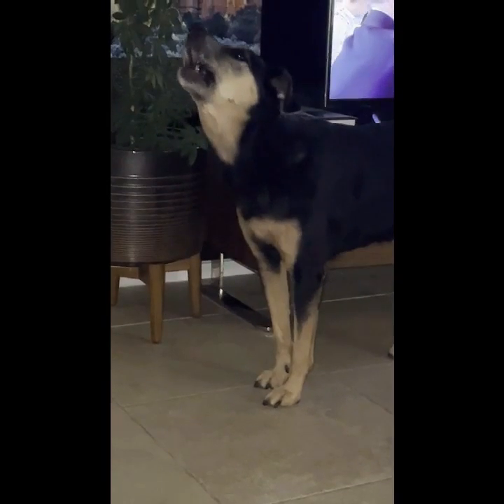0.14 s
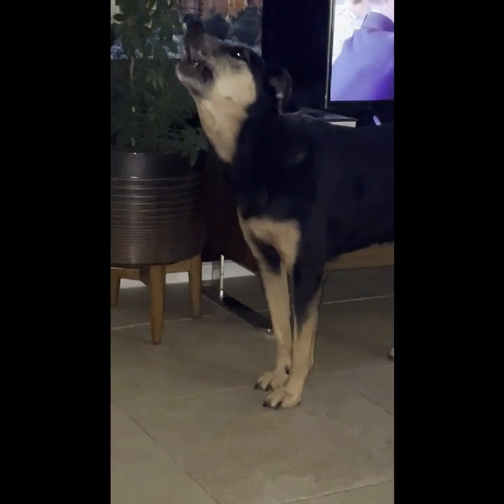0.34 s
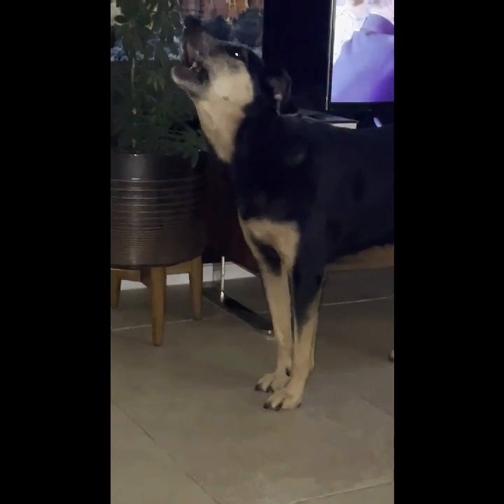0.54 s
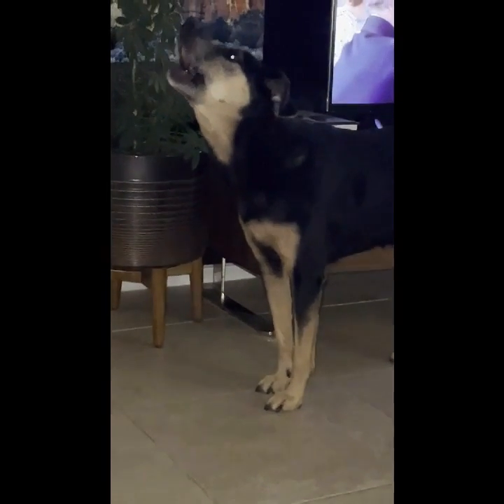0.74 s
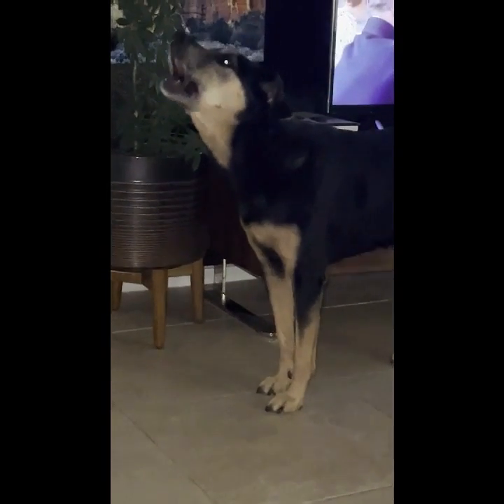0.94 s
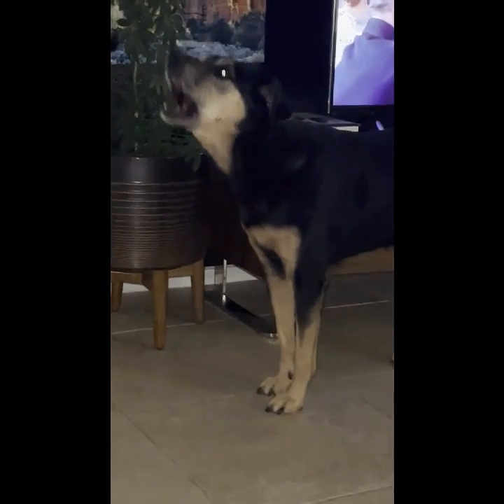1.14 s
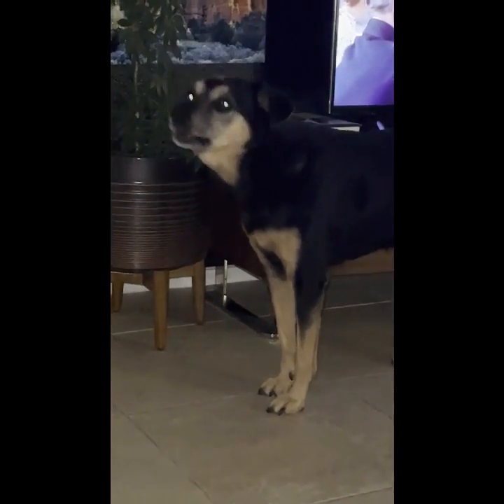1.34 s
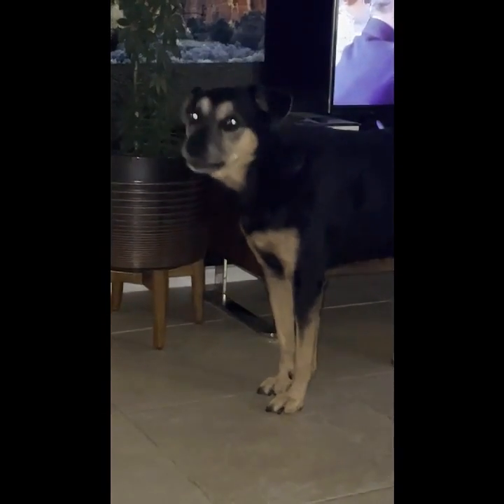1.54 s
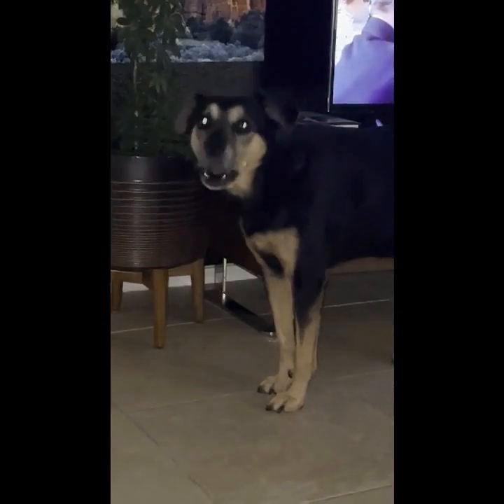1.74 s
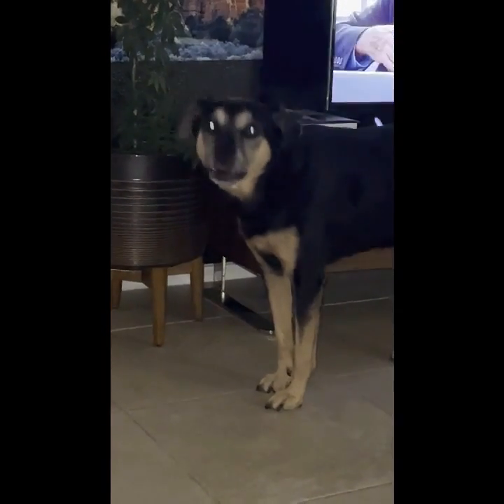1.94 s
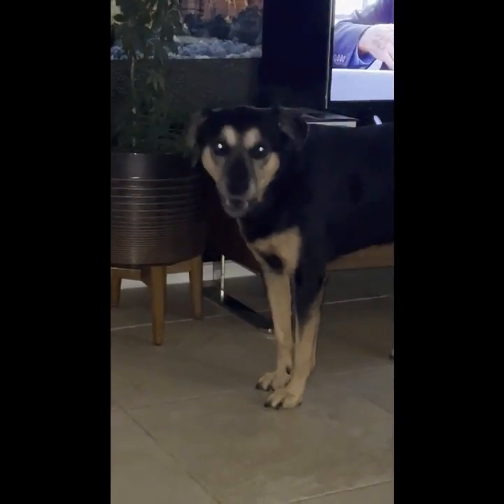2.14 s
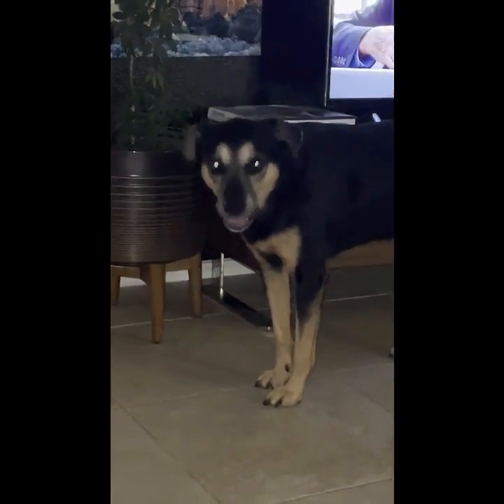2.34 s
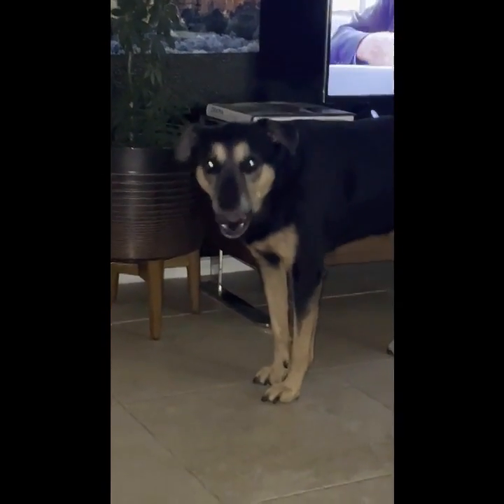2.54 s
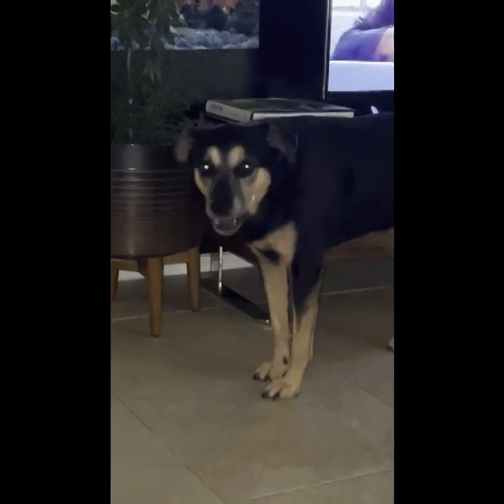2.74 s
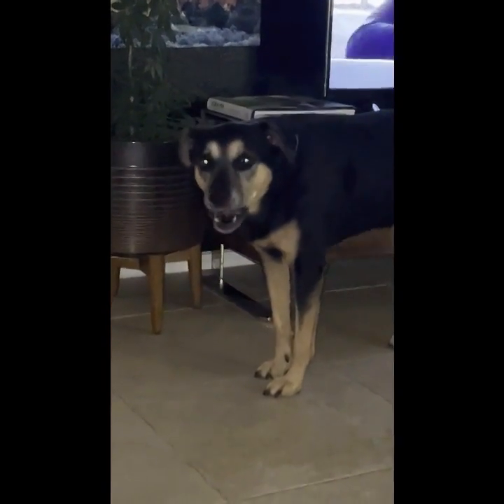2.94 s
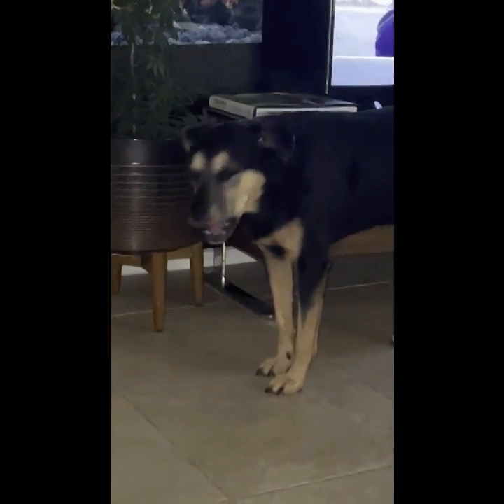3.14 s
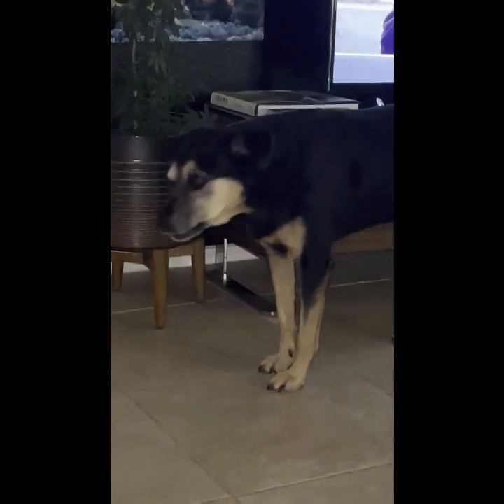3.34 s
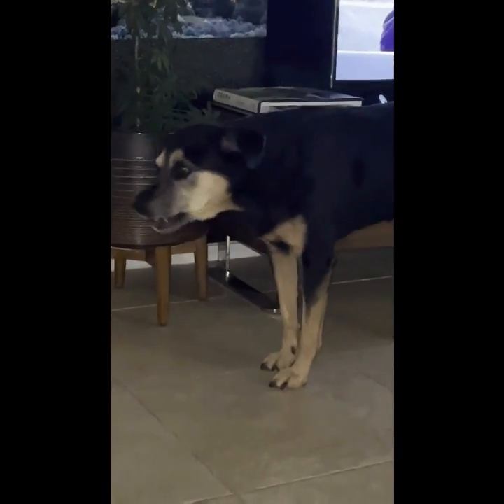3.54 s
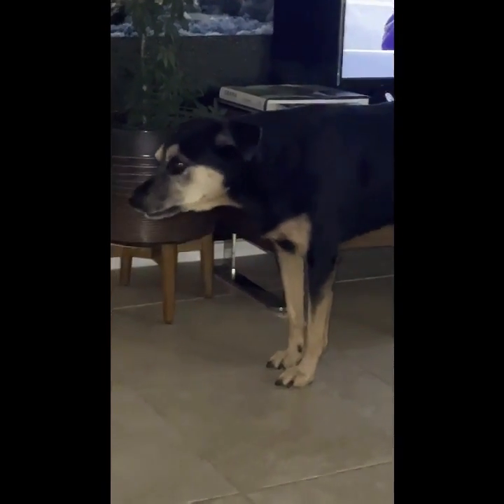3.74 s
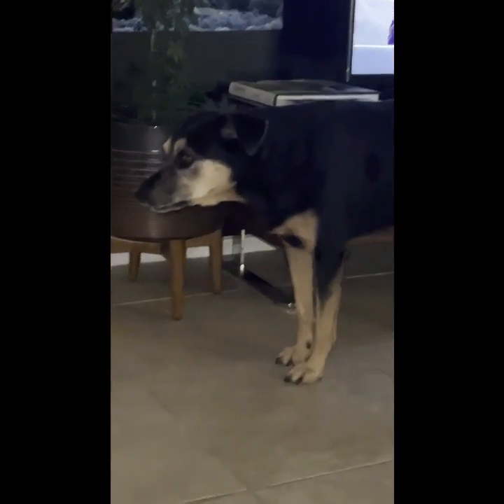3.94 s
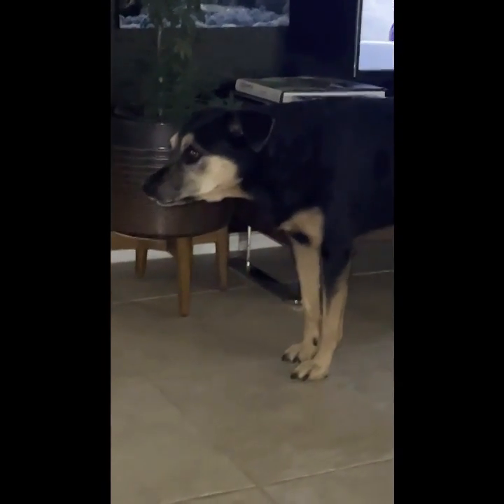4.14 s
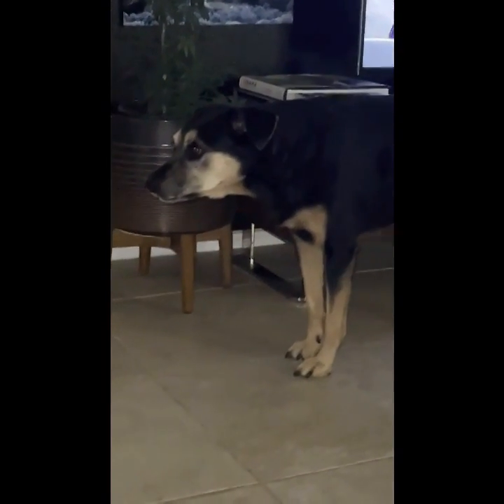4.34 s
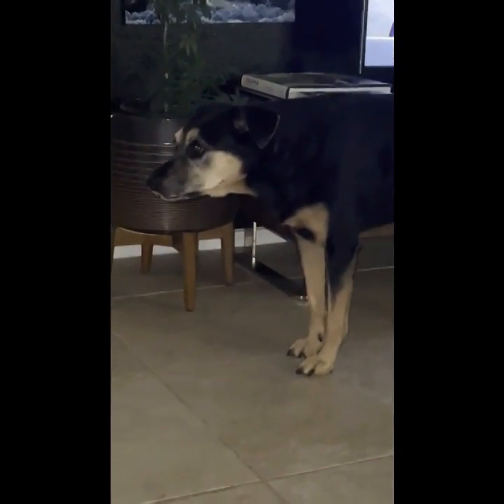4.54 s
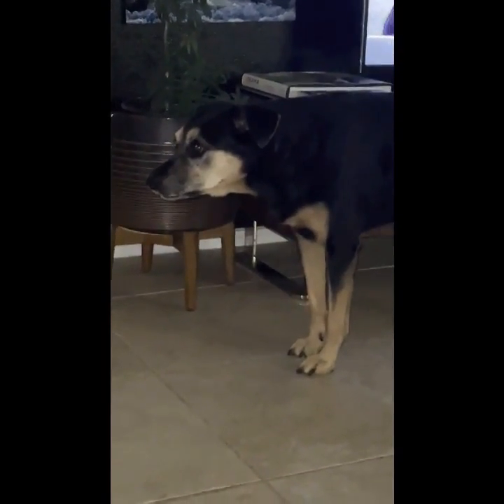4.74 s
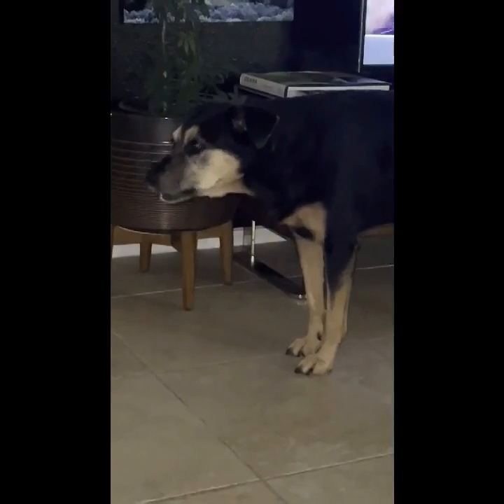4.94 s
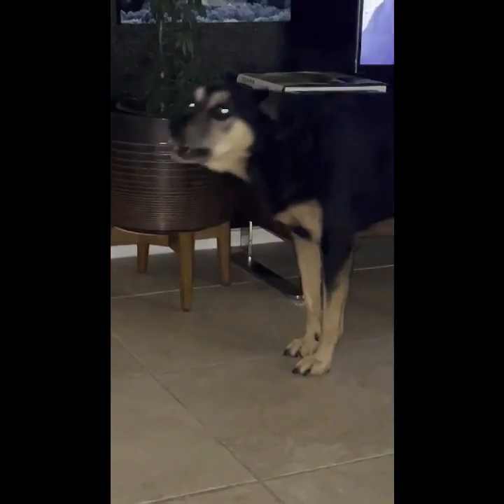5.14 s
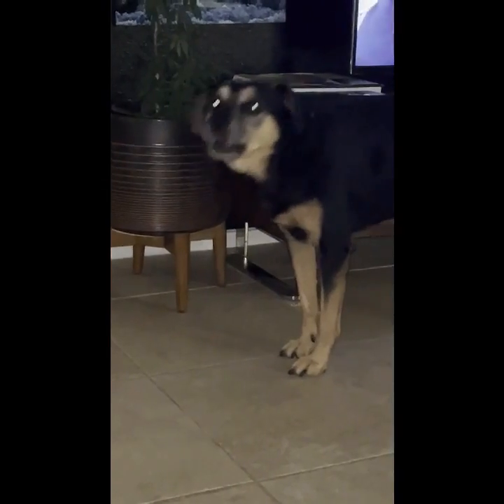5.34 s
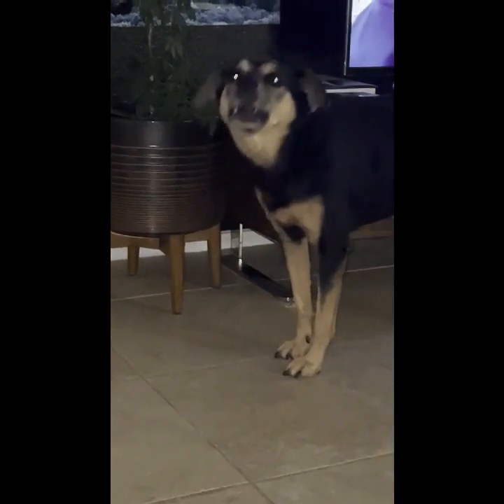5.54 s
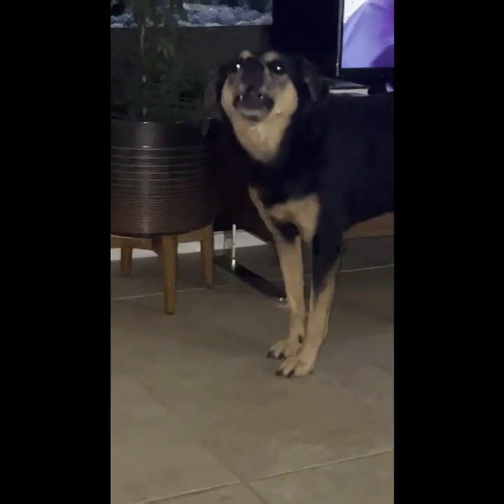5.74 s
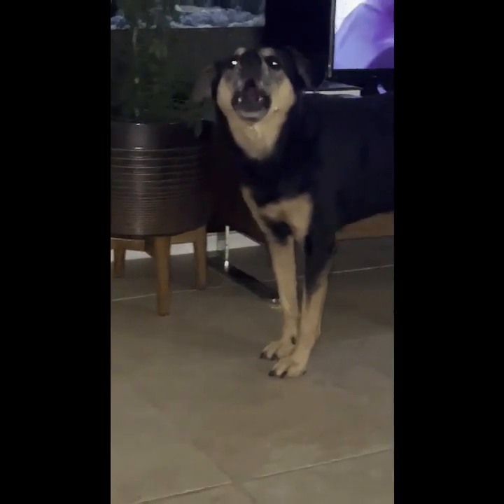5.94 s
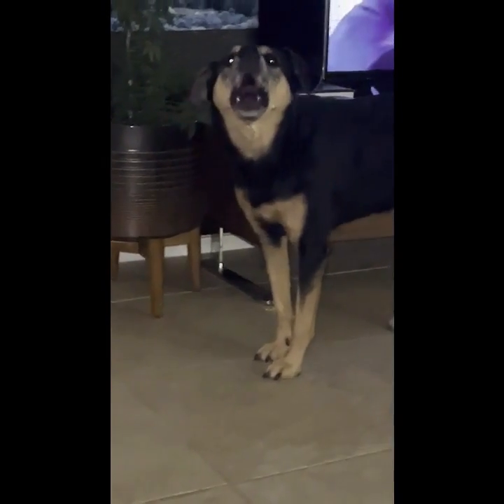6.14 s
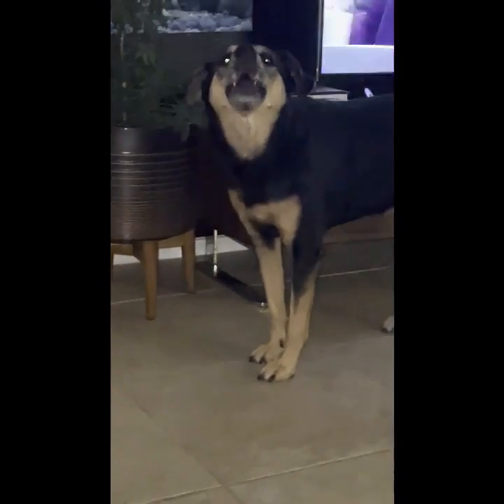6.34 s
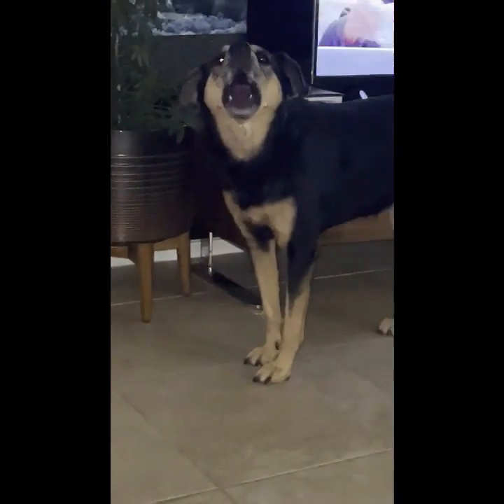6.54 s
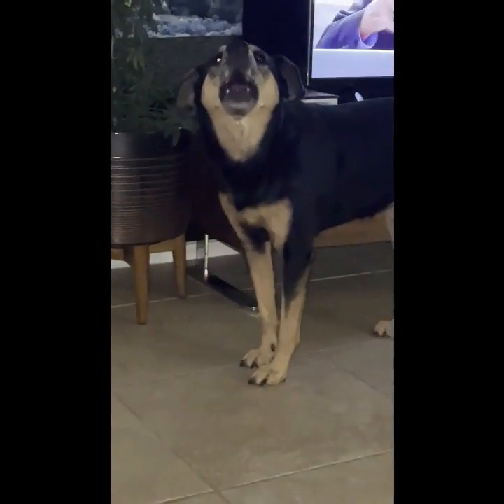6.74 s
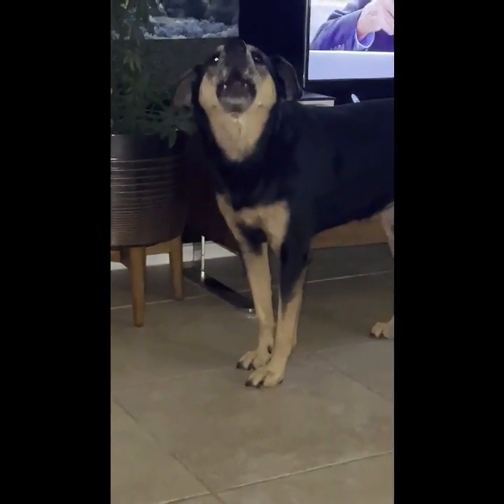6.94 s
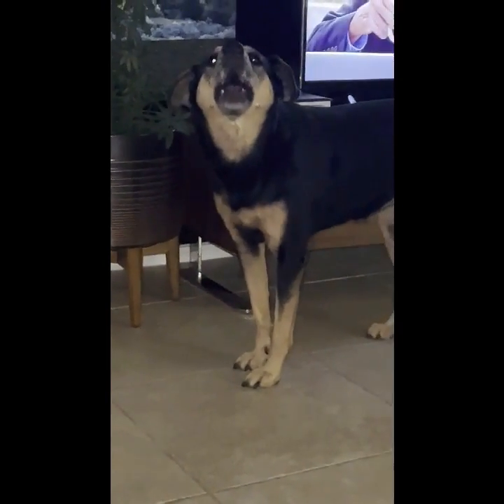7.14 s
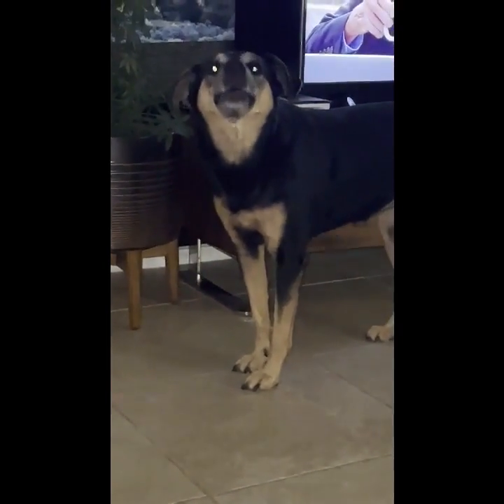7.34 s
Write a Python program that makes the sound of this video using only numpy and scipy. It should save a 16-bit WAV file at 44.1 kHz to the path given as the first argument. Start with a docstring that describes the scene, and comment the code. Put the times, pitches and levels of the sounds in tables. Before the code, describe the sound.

A dog howls close by in a tiled room, long wavering near-pure calls with yelping breaks, a quiet pause, then another rising howl.

```python
"""Dog howling in a tiled room

A dog howls close by in a tiled living room: long wavering calls, short yelps, pauses, one faint inhale.
The vocal folds give a near-clean harmonic stack that at times repeats only every two to five cycles.
Throat and mouth colour the harmonics; the hard room smears each glide into a decaying noise tail.
Shaped noise makes the floor: a lumpy low rumble under a faint hiss."""
import sys
import numpy as np
from scipy import signal
from scipy.fft import rfft, irfft
from scipy.io import wavfile
from scipy.ndimage import uniform_filter1d, minimum_filter1d

SR = 44100
rng = np.random.default_rng(int(sys.argv[2]) if len(sys.argv) > 2 else 0)


def transcribe(signal):
    """Save signal, clipped to [-1, 1], as a 16-bit WAV file at the path in sys.argv[1]."""
    frames = np.atleast_2d(signal).T
    limited = np.clip(frames, -1, 1)
    pcm = np.round(limited * 32767).astype(np.int16)
    wavfile.write(sys.argv[1], SR, pcm)


N = 325899


def from_db(db):
    """Decibels to amplitude gain."""
    return 10 ** (np.asarray(db) / 20)


def rms_one(x):
    """Scale to unit rms."""
    return x / np.sqrt(np.mean(x ** 2) + 1e-20)


def at_hz(points, hz):
    """Interpolate a table of values on a log-frequency axis."""
    point_hz, point_values = np.transpose(points)
    return np.interp(np.log(np.maximum(hz, 1)), np.log(point_hz), point_values)


def drift(rate_hz):
    """Slow chance: white noise through two one-pole low-passes; rms 1."""
    r = np.exp(-2 * np.pi * rate_hz / SR)
    white = rng.standard_normal(N + SR)
    settled = signal.lfilter([1], [1, -2 * r, r * r], white)[SR:]
    return rms_one(settled)


def coloured(spectrum, channels):
    """Gaussian noise shaped by a spectrum; rms 1."""
    hz = np.fft.rfftfreq(N, 1 / SR)
    white = rng.standard_normal((channels, N))
    return rms_one(irfft(rfft(white) * from_db(at_hz(spectrum, hz)), N))


def pair(mid, side, alike):
    """Left and right from a shared and an opposed part; alike is their correlation."""
    alike = np.clip(alike, -1, 1)
    opposed = side * np.array([[1], [-1]])
    return np.sqrt((1 + alike) / 2) * mid + np.sqrt((1 - alike) / 2) * opposed


def gate(start_s, end_s, edge_s):
    """One between start and end, with linear edges."""
    t = np.arange(N) / SR
    return np.clip(np.minimum(t - start_s, end_s - t) / edge_s + .5, 0, 1)


# floor noise density: [f/Hz, level/dB per Hz]
FLOOR_SPECTRUM = [(20, -24), (33, -18), (48, -8), (68, 0), (110, -9), (200, -14), (290, -14), (500, -27),
                  (1000, -34), (2000, -41), (4000, -49), (8000, -55), (15500, -57)]
FLOOR_DB, FLOOR_ALIKE = -66.3, .78


def floor(lumps_db):
    """Stereo noise; a slow random gain makes the part below 130 Hz lumpy, the hiss stays smooth."""
    noise = pair(*coloured(FLOOR_SPECTRUM, channels=2), FLOOR_ALIKE)
    rumble = signal.sosfilt(signal.butter(2, 130, fs=SR, output="sos"), noise)
    lumps = from_db(lumps_db * drift(1.5)) - 1
    return from_db(FLOOR_DB) * (noise + rumble * lumps)


# reverberation time: [f/Hz, T60/s]
ROOM_DECAY = [(300, 0.38), (800, 0.4), (2100, 0.44), (5500, 0.2), (12000, 0.23)]
ROOM_DB, ROOM_ALIKE, ROOM_GAP_S = -4.5, -0.19, 0.0034
ROOM_TREBLE_DB_PER_OCTAVE = -2   # above 3 kHz: soft furnishings swallow reflections


def room(x):
    """Dense reflections as noise bands, each dying at its own T60, partly opposed at the two sides."""
    size = SR
    t = np.arange(size) / SR
    edges_hz = 200 * 2. ** np.arange(0, 6.6, .5)
    white = rng.standard_normal((2, 2, size))
    tail = 0
    for k, (low, high) in enumerate(zip(edges_hz, edges_hz[1:])):
        band_filter = signal.butter(2, [low, high], "band", fs=SR, output="sos")
        band = signal.sosfilt(band_filter, white[k % 2])
        t60 = at_hz(ROOM_DECAY, np.sqrt(low * high))
        treble_db = ROOM_TREBLE_DB_PER_OCTAVE * max(np.log2(low / 3000), 0)
        decay = from_db(treble_db - 60 * t / t60) / np.sqrt(t60)
        tail = tail + band * decay * (t > ROOM_GAP_S)
    tail = pair(tail[0], tail[1], ROOM_ALIKE)
    tail = tail / np.sqrt(np.sum(tail ** 2) / 2)      # unit mean energy per side
    return signal.fftconvolve(x[None], tail, axes=1)[:, :N]


# the voice catches, then restarts sharply: [restart t/s, level/dB]
VOICE_CATCHES = [(.066, -4.5), (0.314, -5), (0.484, -6.5), (0.658, -14), (0.883, -18), (1.085, -8),
                 (1.12, -11.5), (1.73, -6), (5.02, -10), (5.26, -6), (5.619, -21), (6.08, -4), (6.371, -11),
                 (6.954, -6), (7.137, 0.5)]
CATCH_FADE_S, CATCH_RESTART_S = 0.021, .004      # before the restart: fade begins, fade ends


def catches():
    """Gain that moves to each catch's level and springs back as the voice restarts."""
    t = np.arange(N) / SR
    total_db = 0
    for s, db in VOICE_CATCHES:
        total_db = total_db + db * np.interp(t, [s - CATCH_FADE_S, s - CATCH_RESTART_S, s], [0, 1, 0])
    return from_db(total_db)


# lips drawn nearly shut: [start t/s, end t/s]
LIPS_NARROW = [(-1, .47)]


def lips_narrow():
    """One while the lips are drawn nearly shut, zero while the mouth is open."""
    return sum(gate(start, end, .03) for start, end in LIPS_NARROW)


# throat colour of harmonics 2-4, hollow near 4 kHz: [f/Hz, level/dB]
THROAT_LOWER = [(900, -8), (1250, -10), (1600, -3), (1880, 0), (2300, -8), (2750, 0), (3250, -14),
                (3600, -33), (3900, -38), (4400, -22)]
# mouth opening, as lift of harmonics 3 and 4 against 2: [t/s, level/dB]
MOUTH_OPENING = [(0, -31), (.44, -31.5), (.55, -8.5), (0.851, -17.5), (1.099, 0.5), (1.698, -3), (2.1, -5),
                 (2.302, 6), (2.601, -6), (3.0, 5), (3.4, 5), (3.6, -19), (4.96, -11.5), (5.049, 2),
                 (5.299, -11), (5.75, 14), (6.05, -12), (6.3, -17.5), (6.46, -0.5), (6.8, -27), (7.052, -6),
                 (7.38, -8.5)]
FOURTH_DB = -10   # extra on harmonic 4 with the mouth open


def middle(pitch_hz, phase, wander_db):
    """Harmonics 2-4 under throat colour and mouth opening, each swelling on its own; rms 1."""
    lift_db = np.interp(np.arange(N) / SR, *np.transpose(MOUTH_OPENING))
    fourth_db = FOURTH_DB * (1 - lips_narrow())
    total, power = 0, 0
    for k in range(2, 5):
        mouth_db = lift_db * (k > 2) + fourth_db * (k > 3)
        gain = from_db(at_hz(THROAT_LOWER, k * pitch_hz) + mouth_db + wander_db * drift(7.2))
        total = total + gain * np.sin(k * phase)
        power = power + gain ** 2 / 2
    return total / np.sqrt(power)


# throat colour above harmonic 4, mouth open: [f/Hz, level/dB]
THROAT_UPPER = [(2300, 22), (3100, 2), (3500, -1.5), (3800, -21.5), (4400, -13.5), (5300, -5.5),
                (5800, -14), (6500, -2), (7800, -15.5), (9200, -12.5), (11600, -11.5), (13300, -15),
                (14200, -24.5), (15400, -41.5)]
# the same, lips drawn nearly shut: [f/Hz, level/dB]
THROAT_NARROW = [(1590, -68), (2700, -41.5), (3310, -28), (3670, 11), (4530, -32.5), (4940, -21.5),
                 (6060, -37), (6710, -10.5), (8170, -9), (8920, -5), (10700, -15), (13400, -15),
                 (15400, -70.5)]


def overtones(pitch_hz, phase, wander_db, hiss_db):
    """Harmonics 5-27 under throat colour, each swelling on its own, plus the air hissing with them."""
    narrow = lips_narrow()
    total, power = 0, 0
    for k in range(5, 28):
        open_db = at_hz(THROAT_UPPER, k * pitch_hz)
        narrow_db = at_hz(THROAT_NARROW, k * pitch_hz)
        gain = from_db((1 - narrow) * open_db + narrow * narrow_db)
        total = total + gain * from_db(wander_db * drift(11.0)) * np.sin(k * phase + k * k)
        power = power + gain ** 2 * (k * pitch_hz > 4200) / 2      # level reference: above 4.2 kHz only
    treble_filter = signal.butter(3, 4800, "high", fs=SR, output="sos")
    hiss = signal.sosfilt(treble_filter, coloured(THROAT_UPPER, channels=1)[0])
    return total / np.sqrt(power) + from_db(hiss_db + drift(25.)) * rms_one(hiss)


# one curve per call or phrase: [t/s, pitch f/Hz, fundamental level/dB, middle level/dB, upper level/dB]
HOWL_CURVES = [
    [(0.012, 566.7, -12, -31, -65), (0.054, 558.4, -31.5, -43, -65), (0.076, 634, -21, -37, -57),
     (0.196, 580, -28, -37, -64.5), (0.282, 587, -31, -34, -67), (0.306, 610, -25, -48, -61.5),
     (0.34, 619, -20.5, -24.5, -55), (0.406, 629.5, -16.5, -51, -66.5), (0.446, 636.6, -12.5, -36, -62),
     (0.47, 684, -44, -36, -58)],
    [(0.475, 654, -28, -30, -42), (0.487, 692.6, -7.5, -20, -48), (0.513, 847, -24, -28, -42),
     (0.611, 808.4, -14.5, -33, -48), (0.627, 744, -11, -33, -51), (0.651, 733, -22, -36, -46),
     (0.671, 698, -8, -39.5, -47), (0.755, 778, -33.5, -17, -46), (0.785, 759.4, -28, -38, -47),
     (0.88, 740.6, -18.5, -28, -45)],
    [(0.89, 778, -12, -27.5, -50), (0.966, 830, -31.5, -19, -44), (0.974, 822, -17, -28, -42.5),
     (1.028, 832.8, -12, -29.5, -48.5), (1.07, 817, -42, -39.5, -41.5), (1.088, 795.5, -7, -20, -42),
     (1.14, 748, -22.5, -26.5, -50), (1.174, 712, -17, -38, -52), (1.202, 526, -41, -32.5, -59.5),
     (1.22, 520, -36, -36, -55)],
    [(1.665, 680, -56, -45, -64), (1.677, 687.1, -19, -26.5, -45.5), (1.703, 795.6, -13.5, -30.5, -43.5),
     (1.721, 796.6, -43, -19, -36), (1.735, 806.6, -5.5, -13.5, -32), (1.779, 867.7, -31.5, -36.5, -41.5),
     (1.859, 766.2, -36.5, -55, -61), (1.951, 855.5, -38.5, -52, -60.5), (1.979, 750, -33.5, -45, -67),
     (2.02, 792, -49, -60, -64)],
    [(2.035, 772, -46, -39, -53), (2.061, 859, -14.5, -30, -34.5), (2.101, 953.7, -22.5, -24, -40),
     (2.157, 926, -15, -24.5, -46.5), (2.183, 913.5, -17, -28, -35.5), (2.201, 818.4, -17, -21, -44),
     (2.271, 755.6, -27.5, -37, -50.5), (2.295, 719.4, -65, -23.5, -47.5),
     (2.313, 694.3, -31.5, -44.5, -57), (2.35, 710, -35, -49, -53)],
    [(2.385, 732, -29, -26, -48), (2.415, 864, -20.5, -14, -33.5), (2.451, 933.4, -17.5, -21.5, -35),
     (2.483, 928, -35, -13, -30.5), (2.505, 931, -16.5, -30, -38), (2.537, 915.4, -17, -24, -28),
     (2.567, 909, -35, -17.5, -53), (2.655, 878.7, -21.5, -26.5, -39), (2.817, 912.5, -29, -29.5, -45),
     (2.84, 905.6, -49, -20.5, -50)],
    [(2.85, 910.6, -26.5, -31.5, -39), (2.934, 917.8, -17.5, -12, -34), (2.994, 914.7, -26, -24, -40),
     (3.014, 901.7, -10.5, -20, -36.5), (3.064, 840, -40, -20, -41), (3.098, 804, -27.5, -34.5, -56),
     (3.124, 721.6, -26.5, -22, -42.5), (3.192, 553, -26, -36.5, -56), (3.25, 523, -56, -40.5, -57),
     (3.32, 559, -20.5, -36.5, -57)],
    [(3.325, 589.2, -46, -48, -70), (3.339, 590, -20, -27.5, -48), (3.399, 641, -18.5, -27.5, -57),
     (3.407, 634.5, -15.5, -35, -41), (3.431, 648.6, -16.5, -26.5, -54.5), (3.477, 614, -28, -31, -55.5),
     (3.503, 573, -31.5, -41.5, -59.5), (3.537, 502, -39, -41, -69), (3.577, 497.6, -34, -48, -72.5),
     (3.62, 486, -51.5, -52, -78)],
    [(4.945, 477.6, -60, -37.5, -95), (4.963, 536.3, -20, -24.5, -56.5), (4.983, 589.4, -30.5, -39, -63.5),
     (5.015, 631.4, -19, -19.5, -45), (5.025, 771, -15, -29, -42.5), (5.047, 770.5, -38.5, -23, -47),
     (5.113, 835, -30, -38.5, -46.5), (5.159, 795, -56, -56, -59), (5.187, 748.4, -27.5, -42, -53.5),
     (5.25, 765, -54, -42, -53)],
    [(5.255, 746, -25.5, -22, -47), (5.273, 798, -25, -29.5, -41), (5.291, 868, -21.5, -37, -59),
     (5.335, 892, -15.5, -32.5, -44), (5.371, 915, -24.5, -35, -52.5), (5.441, 939.6, -12.5, -31, -46),
     (5.491, 904, -51, -70, -48.5), (5.503, 980, -13.5, -62, -45), (5.583, 996.7, -32.5, -34, -50),
     (5.61, 1017, -28, -53.5, -35)],
    [(5.615, 1009, -29, -26.5, -49), (5.625, 1014, -16.5, -28.5, -37.5), (5.701, 1078, -27.5, -32.5, -46.5),
     (5.737, 1033, -13.5, -26.5, -37), (5.759, 1006, -31, -22, -46), (5.813, 993.4, -27.5, -33, -45.5),
     (5.915, 1081, -18, -28, -38), (5.939, 1086, -40, -28.5, -47.5), (6.003, 1047, -12.5, -14, -37),
     (6.07, 1018, -44, -39, -47.5)],
    [(6.078, 922.3, -28, -28, -36), (6.084, 909.3, -12, -11.5, -35), (6.12, 915, -16, -14.5, -33.5),
     (6.15, 917, -41, -26, -43), (6.176, 912, -23, -29, -36), (6.212, 787, -21, -17.5, -43.5),
     (6.262, 738, -25.5, -22, -53), (6.284, 838, -28, -40, -47), (6.312, 837, -20.5, -47, -51),
     (6.335, 842, -26, -27.5, -50)],
    [(6.34, 841, -39, -33, -48), (6.374, 856.3, -16.5, -15, -34), (6.474, 875, -15.5, -21, -41),
     (6.498, 861.3, -13.5, -37, -42), (6.596, 825, -15, -20.5, -40.5), (6.7, 801.2, -19.5, -25, -43.5),
     (6.764, 755, -27, -17, -51), (6.856, 708, -31, -33, -54.5), (6.918, 716.5, -17.5, -27.5, -46),
     (6.94, 704, -23, -67, -58)],
    [(6.945, 697, -14, -32, -35.5), (6.961, 689.4, -5.5, -33, -44.5), (6.993, 685.7, -18, -34.5, -48),
     (7.057, 651, -9.5, -42, -50.5), (7.101, 674.7, -53, -45, -54), (7.135, 580, -31, -38.5, -55.5),
     (7.169, 621, -24, -49, -59), (7.179, 574, -35.5, -41.5, -58.5), (7.299, 536.5, -26, -38.5, -65.5),
     (7.375, 626, -24, -30.5, -47.5)],
]
# pauses between calls, voice silent: [start t/s, end t/s]
VOICE_RESTS = [(1.221, 1.665), (2.351, 2.385), (3.62, 4.945)]
# erratic cycle lengths where the voice breaks: [start t/s, end t/s, spread/share of pitch]
VOICE_BREAKS = [(.49, .66, .028), (1.08, 1.2, .008), (1.665, 1.8, .012), (1.85, 2.04, .012),
                (2.15, 2.3, .009), (2.39, 2.44, .008), (3.07, 3.22, .022), (4.95, 5.12, .013),
                (6.075, 6.3, .008), (6.36, 6.41, .006)]
RASP_SHIMMER_DB = 60   # scatter of cycle strength, per unit of spread
# folds repeat after several cycles: [start t/s, end t/s, cycles, [(pattern harmonic, starting level/dB)]]
UNEVEN_FOLDS = [(0.499, 0.526, 5, [(4, -24), (6, -21), (9, -18), (11, -51)]), (0.557, 0.643, 5, [(6, -30),
                (7, -41), (9, -32), (11, -34)]), (0.723, 0.859, 3, [(2, -38.5), (4, -33.5), (5, -36),
                (7, -39.5), (10, -57.5)]), (1.726, 1.767, 4, [(5, -27.5), (7, -18), (9, -20), (13, -18.5)]),
                (5.017, 5.067, 4, [(2.94, -20)]), (5.019, 5.146, 2, [(3, -27), (5, -34.5), (7, -53)]),
                (5.257, 5.283, 4, [(5, -29)]), (6.077, 6.169, 4, [(3, -23.5), (5, -30), (7, -32), (9, -26),
                (11, -37), (13, -40)])]
# breath noise density: [f/Hz, level/dB per Hz]
BREATH_SPECTRUM = [(300, -45), (500, -6), (800, 0), (1250, -14), (1800, -9), (2200, -18), (2800, -16),
                   (3500, -40), (16000, -60)]
BREATH_DB, RASP_BREATH_DB = -37, 700   # against middle harmonics; extra per unit of spread
# audible inhale: (start t/s, end t/s, level/dB)
INHALE_SPAN = (4.82, 4.96, -71)


def voice(jitter, shimmer_db):
    """Fold harmonics on the pitch curve, uneven-cycle lines, and breath puffed once a cycle."""
    t = np.arange(N) / SR
    s, *columns = np.transpose(np.concatenate(HOWL_CURVES))
    pitch_hz, low_db, middle_db, upper_db = [np.interp(t, s, c) for c in columns]
    sounding = 1 - sum(gate(start, end, 0.0097) for start, end in VOICE_RESTS)

    rasp = sum(spread * gate(start, end, .02) for start, end, spread in VOICE_BREAKS)
    scattered_hz = pitch_hz * (1 + jitter * drift(60.) + rasp * drift(150.))
    phase = 2 * np.pi * np.cumsum(scattered_hz) / SR
    tone = np.sqrt(2) * from_db(low_db) * np.sin(phase)
    tone = tone + from_db(middle_db) * middle(pitch_hz, phase, wander_db=4.5)
    upper_phase = phase + .05 * drift(90.)
    tone = tone + from_db(upper_db - 3) * overtones(pitch_hz, upper_phase, wander_db=5.0, hiss_db=-3)

    for start, end, cycles, lines in UNEVEN_FOLDS:
        settle_db = -6 * np.clip((t - start) / (end - start), 0, 1)      # fades as the folds settle
        pattern = sum(from_db(db) * np.sin(round(k) / round(cycles) * phase + k * k) for k, db in lines)
        tone = tone + gate(start, end, 0.02) * from_db(settle_db) * pattern

    air = coloured(BREATH_SPECTRUM, channels=1)[0]
    breath_db = middle_db + BREATH_DB + RASP_BREATH_DB * rasp
    breath = from_db(breath_db) * air * (1 + .5 * np.cos(phase))
    inhale_start, inhale_end, inhale_db = INHALE_SPAN
    inhale = from_db(inhale_db) * gate(inhale_start, inhale_end, .04) * air
    shimmer = from_db(shimmer_db * drift(30.) + RASP_SHIMMER_DB * rasp * drift(180.0))
    dog = (tone * shimmer + breath) * sounding * catches() + inhale
    mouth = signal.butter(8, 480, "high", fs=SR, output="sos")      # a small mouth radiates no bass
    return signal.sosfilt(mouth, dog)


PAN_DB = -1   # left minus right


def scene():
    """The dog direct, its room tail and the floor, summed in stereo."""
    dog = voice(jitter=0.0024, shimmer_db=1.5)
    direct = from_db(-2.0) * dog * from_db([[PAN_DB / 2], [-PAN_DB / 2]])
    direct[1] = np.roll(direct[1], 1)      # right lags one sample: dog a little nearer the left side
    return direct + from_db(ROOM_DB) * room(dog) + floor(lumps_db=4.0)


# narrow treble band left nearly silent: (low f/Hz, high f/Hz)
TREBLE_DIP_BAND_HZ = (10050, 11280)
LOPSIDED_DB = -20.5   # uneven microphone travel: gain of the squared term
CUTOFF_HZ = 15570


def record(dry):
    """Squaring leaves the envelope in the bass; then a treble dip, a peak limiter and a cut top."""
    bass_filter = signal.butter(2, [90, 420], "band", fs=SR, output="sos")
    bass = signal.sosfilt(bass_filter, dry ** 2)
    dip_filter = signal.butter(2, TREBLE_DIP_BAND_HZ, "bandstop", fs=SR, output="sos")
    wet = signal.sosfilt(dip_filter, dry) + from_db(LOPSIDED_DB) * bass
    allowed = 1 / np.maximum(np.abs(wet).max(axis=0), 1)      # keeps each sample inside full scale
    gain = uniform_filter1d(minimum_filter1d(allowed, size=441), size=441)      # eased over 10 ms
    top_filter = signal.cheby2(16, 30, CUTOFF_HZ, fs=SR, output="sos")
    return signal.sosfilt(top_filter, wet * gain)


dry = scene()
out = record(dry)
transcribe(out)
```